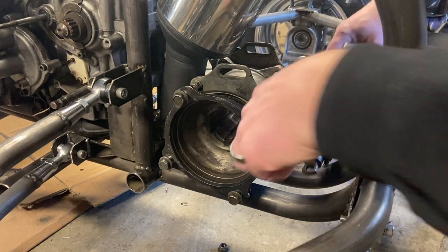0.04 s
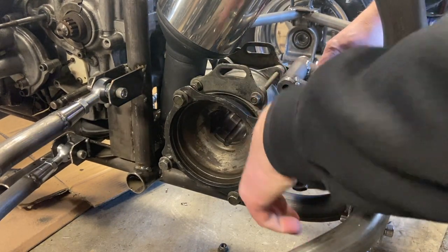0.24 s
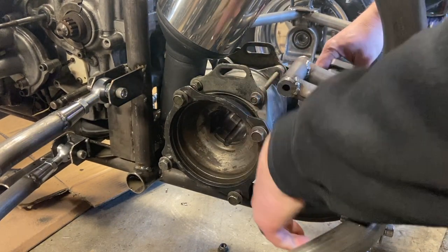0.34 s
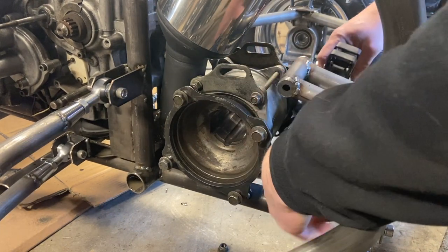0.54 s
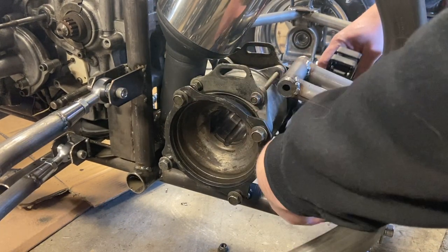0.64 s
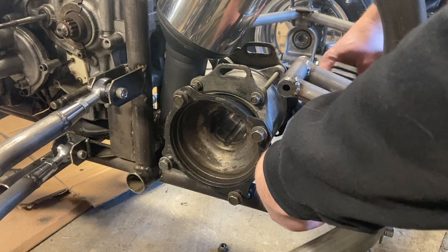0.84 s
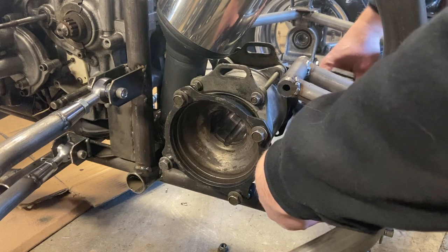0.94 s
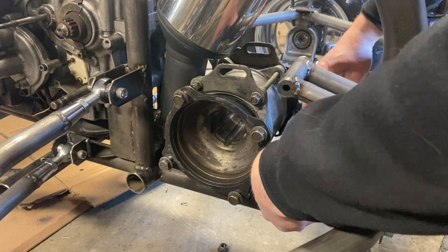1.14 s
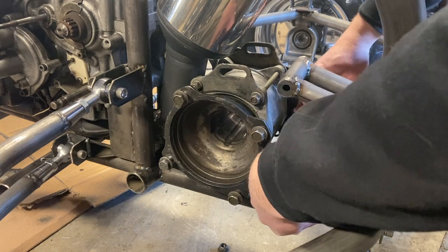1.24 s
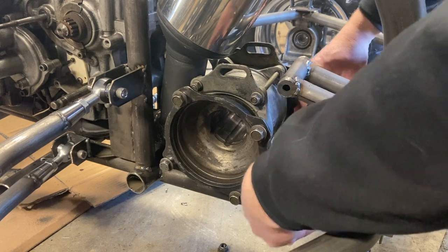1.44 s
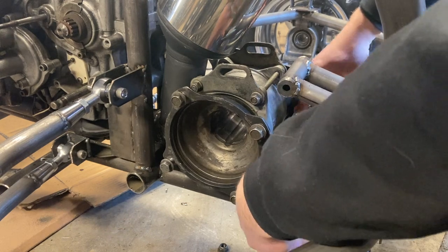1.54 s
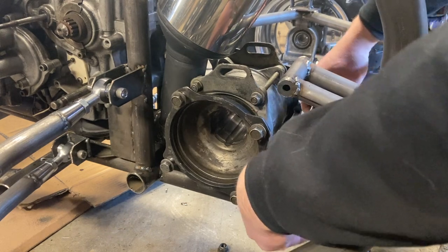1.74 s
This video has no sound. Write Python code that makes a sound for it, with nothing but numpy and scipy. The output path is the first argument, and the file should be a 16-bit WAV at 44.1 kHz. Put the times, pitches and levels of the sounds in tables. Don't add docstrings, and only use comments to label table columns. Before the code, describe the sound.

Irregular hard metal clanks as a scissor jack is fitted against a steel frame, close up

```python
import sys
import numpy as np
from scipy import signal
from scipy.fft import rfft, irfft, next_fast_len
from scipy.io import wavfile
from scipy.ndimage import uniform_filter1d

SR = 44100
rng = np.random.default_rng(int(sys.argv[2]) if len(sys.argv) > 2 else 0)


def master_out(mix):
    frames = np.transpose(np.atleast_2d(mix))
    ceiling = np.clip(frames, -1, 1)
    pcm = np.round(ceiling * 32767).astype(np.int16)
    wavfile.write(sys.argv[1], SR, pcm)


def field_ratio(decibels):
    return 10 ** (np.asarray(decibels, dtype=float) / 20)


N = 79380
T = np.arange(N) / SR

# (time [s], level [dB], boom re level [dB],
# treble tilt [dB/octave], rattle length [s])
SQUEAK_KNOCKS = [
    (.046, -49, -30, -2, .05),
]
LEAD_INS = [
    (0.116, -44, -45, -2.3, 0.012),
    (0.769, -46, -38, -2.2, .006),
]
ARM_KNOCKS = [
    (0.126, -4.5, -15.5, 1.5, 0.0032),
]
NUDGES = [(.209, -33, 4.5, -12.5, 0.00069), (.254, -37.5, 7.5, -6.5, 0.019), (1.04, -39, 5, -9, 0.015),
          (1.115, -58.5, 15, -4, 0.014), (1.175, -54.5, 2.5, -13.5, 0.029), (1.216, -50.5, -19, -12, 0.011),
          (1.228, -43, 8, -12.5, 0.0066), (1.24, -45.5, 6, -12.5, 0.028), (1.262, -54, 10.5, -18, .01),
          (1.345, -41, -7, -7.5, 0.0074), (1.412, -58, -19, -7, 0.0057)]
TOUCH_KNOCKS = [
    (0.458, -15.5, -12.5, -4, 0.0023),
]
SCREW_KNOCKS = [
    (0.511, -10.5, -20.5, 0.26, 0.0054),
]
BASE_KNOCKS = [
    (0.776, -9.5, -7.5, 0.21, 0.0051),
]
PIN_KNOCKS = [
    (1.009, -24, -15, 0.0049, 0.0048),
]
SADDLE_KNOCKS = [
    (1.504, -13.5, -7, -1.34, 0.012),
]
REBOUND_KNOCKS = [
    (1.5131, -22, -46, 1, .003),
]
TAP_KNOCKS = [
    (1.628, -29, -1.5, -7.5, 0.0039),
    (1.746, -22, -21, -4, 0.0054),
    (1.775, -28, -3, -9.5, 0.0014),
]

# (frequency [Hz], level [dB], t60 [s])
SQUEAK = [(695, 3, .05), (1470, 13, 0.043), (2130, 8, .05), (2500, 0, 0.037)]
LEAD_IN_TONE = [(1095, 18.4, 0.14)]
ARM = [(563, -29, 0.076), (719, 5, 0.037), (900, -7, 0.38), (1160, 6.5, 0.03), (1363, -3, 0.073),
       (2620, -2, .025), (3233, 0.5, 0.034), (3970, -1, 0.026), (6700, -12.5, 0.048)]
LOOSE = [(392, -9.5, 0.017), (843, -3.5, .04), (930, -5, .04), (1170, -8, 0.04), (1840, -10, 0.037),
         (2660, 1.5, 0.053), (3300, -10, .06), (4200, -20, .05)]
TOUCH = [(904, -11, 0.34), (1174, -2.5, 0.034), (2100, -22, 0.057), (3180, 1.5, 0.033), (3350, -4.5, .05),
         (4000, -7, 0.021), (4600, -7, .02), (5076, -7, 0.047), (7300, -16, .03)]
SCREW = [(945, -20, 0.26), (1820, -8, 0.41), (1943, 4.5, 0.2), (2007, -6, 0.12), (3430, -6, 0.16),
         (5380, 3.5, 0.01), (6330, 4.5, 0.015), (14570, -28, .2),
         (5180, -19, .5), (5270, -17, .5), (5370, -11, .15)]
BASE = [(590, -14.5, 0.35), (787, -18.5, 0.75), (950, 0, 0.044), (987, -2.5, 0.17), (1030, -20, 0.025),
        (1280, -10, 0.015), (2010, -24, .04), (2820, -9, 0.12), (3350, -34, .05), (3950, -25, 0.056),
        (5450, -9, 0.24), (5490, -1.5, 0.034), (11720, -3, 0.021)]
PIN = [(404, -6.5, 0.13), (1470, -2.5, 0.15), (1577, -7.5, 0.07), (2250, -19, 0.045), (700, -9, 0.16)]
SADDLE = [(870, -7, 0.09), (1040, -25, 0.02), (1193, 8.5, 0.039), (1436, -4.5, .06), (1500, 4, 0.017),
          (2060, -3, 0.016), (2220, -0.5, 0.019), (2440, -5, 0.035), (2694, 0, 0.022), (3170, 4.5, 0.035),
          (3400, 2, 0.02), (3940, -8, 0.039)]
REBOUND = [(3480, -4, 0.024), (5125, 9.5, 0.0094), (6810, 4, 0.049)]
TAP = [(794, -42, 0.09), (1220, -10.5, 0.085), (1537, -3, 0.03), (1820, 0, 0.023), (2750, -1.5, 0.054)]
# (frequency [Hz], level [dB], t60 [s])
FRAME = [(131, -18.5, 0.06), (189, -3.5, 0.084), (204.9, -7, 0.28), (235, -10.5, 0.17), (256, -12, 0.15),
         (408, -17.5, 0.28)]
FRAME_DEEP = [(128, -18, .08), (178, 0, .085), (203, -13, .25), (236, -13, .16), (291, -13, .12),
              (412, -26, .15)]
# (frequency [Hz], level [dB], t60 [s])
SLIDING = [(1460, -8, 0.04), (3280, -4, 0.06), (5170, -11, .03), (6630, -8, 0.04)]
DRAG = [(440, -2, 0.018), (646, -0.5, 0.022), (940, -13.5, 0.0084), (1778, -3.5, 0.048)]

# (time [s], level [dB])
RUB = [(0, -53), (.1, -90), (.3, -49), (0.376, -48.5), (.43, -60.5), (.75, -63.5), (.95, -52.5), (1.1, -68),
       (1.19, -55.5), (1.25, -48), (1.31, -53), (1.34, -65), (1.399, -55), (1.45, -49), (1.55, -50.5),
       (1.68, -63.5), (1.8, -47.5)]
# (frequency [Hz], density [dB per Hz])
RUB_COLOUR = [(150, -24), (400, 0), (1000, 2), (2000, -4), (4000, -11), (7000, -10), (11500, -16.5),
              (16000, -22)]
CRACK = [(200, -28.5), (450, -15), (750, -1.5), (1100, 0.5), (2300, -3), (5500, -5), (9000, -8.5),
         (15800, -24)]
CLATTER = [(200, -17.5), (400, 12.5), (800, 14.5), (2000, -6.5), (6000, -24), (15000, -19.5)]
FLOOR = [(25, -8), (60, 10), (110, 8), (200, 3), (400, 2.5), (800, -8), (2500, -13.5), (6000, -23),
         (16000, -33)]
# (frequency [Hz], t60 [s])
ROOM_T60 = [(100, 0.63), (300, 0.53), (1000, 0.4), (3000, 0.35), (8000, 0.26), (16000, 0.11)]
# (frequency [Hz], likeness [0-1])
ROOM_ALIKE = [(60, 0.9), (180, 1), (350, 0.49), (600, 0.21), (1400, 0.26), (3000, 0.43), (7000, 0.34),
              (8400, 0.93)]
# (frequency [Hz], phase [rad])
PORT_LEAD = [(60, .1), (330, .4), (600, 1.8), (1100, .9), (3000, .6), (7200, .1), (8450, -2.95),
             (9700, -3.35), (10500, -5.9), (11900, -6.5), (12600, -9.15), (14000, -9.7), (14400, -12.2)]
# (frequency [Hz], level [dB])
PORT_BALANCE = [(60, 3), (150, 0.5), (600, 2), (1200, 0.5), (4000, 4.5), (8300, 3.6), (12000, 0.5),
                (15000, -3)]

FRAME_LAG_S, FRAME_PUSH_S = 0.0073, 0.0017
FRAME_SCATTER_DB, FRAME_DB, FRAME_SHAKE_DB = -1, 5, -23
RING_DB, CRACK_DB, FIRST_CONTACT_DB = -9, -6, 12.5
TOUCH_CRACK_DB, SADDLE_CRACK_DB, SQUEAK_CRACK_DB = 1.5, -5, -10
RISE_S, FALL_SHARE, SAG_S, BLOW_S = 0.0013, 1, 0.017, 0.0032
SPREAD, LOW_CUT_HZ = 0.0184, 136.7
CLATTER_DB, CLATTER_T60_S, CLATTER_GRAIN_DB = -20.5, 0.31, 3.5
RUB_RING_DB, RUB_BOOM_DB, RUB_GRAIN_DB, RUB_DB = -10.5, -2.5, 1.5, 0.5
DRAG_FROM_S, DRAG_TO_S, DRAG_EDGE_S, DRAG_DB = 1.17, 1.47, .05, -50.5
HUM_HZ, HUM_DB, HUM_T60_S, HUM_AGAIN_S = 288, -33.5, .17, .062
FLOOR_DB, FLOOR_SWAY_DB = -52, 1.
ROOM_DB, ROOM_GAP_S, EARLY_DB, EARLY_T60_S = -6.5, 0.006, -6.5, 0.079
RING_TO_ROOM_DB, TOP_HZ = -7.5, 15900


def curve(table, hz):
    points = np.array(table, float)
    return np.interp(np.log(np.maximum(hz, 1)), np.log(points[:, 0]), points[:, 1])


def unit(x):
    return x / (np.sqrt(np.mean(x ** 2)) + 1e-18)


def colour(x, table, tilt_db=0.):
    hz = np.fft.rfftfreq(2048, 1 / SR)
    level_db = curve(table, hz) + tilt_db * np.log2(np.clip(hz, 700, 16000) / 2000)
    cepstrum = irfft(level_db * np.log(10) / 20)
    cepstrum[1:1024] *= 2
    cepstrum[1025:] = 0
    h = irfft(np.exp(rfft(cepstrum)))
    return signal.fftconvolve(x, h / np.sqrt(np.sum(h ** 2)))[:len(x)]


def mode(x, hz, t60):
    pole = np.exp(2j * np.pi * min(hz, .45 * SR) / SR - np.log(1000) / (max(t60, .005) * SR))
    return signal.lfilter([1], [1, -pole], x).imag


def pair(mid, side):
    alike = np.clip(curve(ROOM_ALIKE, np.fft.rfftfreq(len(mid), 1 / SR)), 0, 1)
    m = rfft(mid) * np.sqrt((1 + alike) / 2)
    s = rfft(side) * np.sqrt((1 - alike) / 2)
    return irfft(np.array([m + s, m - s]), len(mid))


def garage_floor():
    still = pair(*(unit(colour(v, FLOOR)) for v in rng.standard_normal((2, N))))
    drift = uniform_filter1d(rng.standard_normal(N), size=4000)
    sway = unit(uniform_filter1d(drift, size=4000))
    return field_ratio(FLOOR_DB + FLOOR_SWAY_DB * sway) * still


def hum():
    touches = np.zeros(N)
    touches[0] = 1
    touches[int(HUM_AGAIN_S * SR)] = .7
    return field_ratio(HUM_DB) * mode(touches, HUM_HZ, HUM_T60_S)


def sing(x, body):
    return sum(field_ratio(g) * mode(x, f, d) * np.sqrt(4 * np.log(1000) / (d * SR)) for f, g, d in body)


def rub():
    pressure = np.array(RUB)
    hiss = rng.standard_normal(N)
    clumps = unit(uniform_filter1d(rng.standard_normal(N), size=200))
    grain = unit(hiss * field_ratio(RUB_GRAIN_DB * clumps))
    slide = grain * field_ratio(np.interp(T, pressure[:, 0], pressure[:, 1]) + RUB_DB)
    drag_env = np.clip(np.minimum(T - DRAG_FROM_S, DRAG_TO_S - T) / DRAG_EDGE_S, 0, 1)
    drag = grain * field_ratio(DRAG_DB) * drag_env
    rung = field_ratio(RUB_RING_DB) * sing(slide, SLIDING) + field_ratio(RUB_BOOM_DB) * sing(slide, FRAME)
    return colour(slide, RUB_COLOUR) + rung + sing(drag, DRAG)


def ring(x, modes, scatter_db=0., spread=0.):
    out = 0
    for hz, level_db, t60 in modes:
        cluster = (mode(x, hz, t60) + 0.6 * mode(x, hz * (1 + spread), t60)
                   - 0.76 * mode(x, hz * (1 - 1.5 * spread), t60))
        gain = field_ratio(level_db + scatter_db * rng.standard_normal())
        out = out + gain * cluster / np.abs(cluster).max()
    return out


def knock(row, modes, frame=FRAME, crack_db=0.):
    at, db, boom_db, tilt_db, length = row
    t = T[:SR * 3 // 4]
    noise = rng.standard_normal((4, len(t)))

    rise = np.clip(t / RISE_S, 0, 1) ** 2
    release = np.maximum(t - RISE_S - length, 0) / (FALL_SHARE * length)
    env = rise * np.exp(-t / (SAG_S + length) - release)
    rattle = env * noise[0] * field_ratio(4.6 * noise[1])
    rattle[int(RISE_S * SR)] += field_ratio(FIRST_CONTACT_DB)
    clumps = unit(uniform_filter1d(noise[3], size=300))
    loose = rise * noise[2] * field_ratio(CLATTER_GRAIN_DB * clumps - 60 * t / CLATTER_T60_S)
    crack = field_ratio(CRACK_DB + crack_db) * colour(rattle, CRACK, tilt_db)
    noisy = crack + field_ratio(CLATTER_DB) * colour(loose, CLATTER, tilt_db)

    tilted = [(f, g + tilt_db * np.log2(f / 2000), d) for f, g, d in modes]
    blow = rattle * np.exp(-t / (BLOW_S + max(length - .02, 0)))
    part = field_ratio(RING_DB) * ring(blow, tilted, spread=SPREAD)
    push = np.sin(np.pi * np.clip((t - FRAME_LAG_S) / FRAME_PUSH_S, 0, 1)) ** 2
    shake = field_ratio(FRAME_SHAKE_DB) * loose * 10
    boom = field_ratio(FRAME_DB + boom_db) * ring(push + shake, frame, FRAME_SCATTER_DB)

    out = np.zeros((2, N + len(t)))
    i = int((at - .001) * SR)
    out[:, i:i + len(t)] = np.array([noisy, part + boom]) * field_ratio(db)
    return out[:, :N]


def garage(x):
    t = T[:SR * 3 // 4]
    noise = rfft(pair(*rng.standard_normal((2, len(t)))))
    octave = np.log2(np.maximum(np.fft.rfftfreq(len(t), 1 / SR), 1) / 62.5)
    early = field_ratio(EARLY_DB - 60 * t / EARLY_T60_S)
    h = 0
    for k in range(9):
        share = np.clip(1 - np.abs(np.clip(octave, 0, 8) - k), 0, 1)
        tail = field_ratio(-60 * t / curve(ROOM_T60, 62.5 * 2 ** k))
        h = h + irfft(noise * share, len(t)) * (tail + early)
    h = h * np.clip(t / ROOM_GAP_S - .5, 0, 1)
    h = h / np.sqrt(np.sum(h ** 2) / 2)
    return field_ratio(ROOM_DB) * signal.fftconvolve(x[None], h, axes=1)[:, :N]


def scene():
    parts = (
        (ARM_KNOCKS, ARM, FRAME_DEEP),
        (TOUCH_KNOCKS, TOUCH, FRAME, TOUCH_CRACK_DB),
        (TAP_KNOCKS, TAP),
        (SCREW_KNOCKS, SCREW),
        (BASE_KNOCKS, BASE, FRAME_DEEP),
        (PIN_KNOCKS, PIN),
        (SADDLE_KNOCKS, SADDLE, FRAME_DEEP, SADDLE_CRACK_DB),
        (REBOUND_KNOCKS, REBOUND),
        (NUDGES, LOOSE),
        (SQUEAK_KNOCKS, SQUEAK, FRAME, SQUEAK_CRACK_DB),
        (LEAD_INS, LEAD_IN_TONE))
    knocks = sum(knock(row, *body) for rows, *body in parts for row in rows)
    near = knocks + np.array([rub(), hum()])
    low_cut = signal.butter(4, LOW_CUT_HZ, "high", fs=SR, output="sos")
    noisy, rung = signal.sosfilt(low_cut, near)
    still = garage_floor()
    return noisy + rung + garage(noisy + field_ratio(RING_TO_ROOM_DB) * rung) + still


def roll_off(x):
    return signal.sosfilt(signal.butter(12, 16650, fs=SR, output="sos"), x)


def record(dry):
    n = next_fast_len(N + 4096)
    hz = np.fft.rfftfreq(n, 1 / SR)
    side = np.array([[.5], [-.5]])
    top_cut = 1 / (1 + (hz / TOP_HZ) ** 80)
    ports = field_ratio(side * curve(PORT_BALANCE, hz)) * np.exp(1j * side * curve(PORT_LEAD, hz)) * top_cut
    heard = irfft(rfft(dry, n) * ports, n)[:, :N]
    mix = np.tanh(0.77 * heard) / 0.84
    return roll_off(mix)


dry = scene()
out = record(dry)
master_out(out)
```